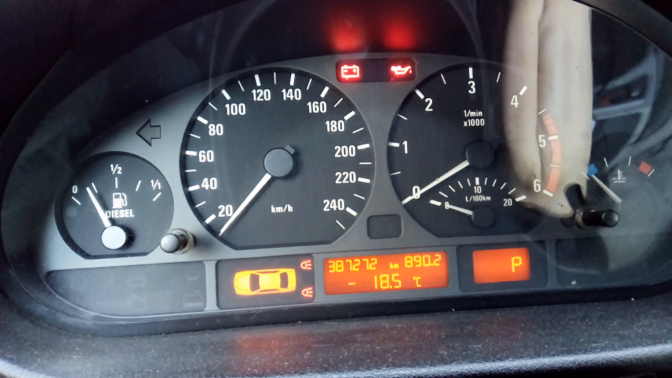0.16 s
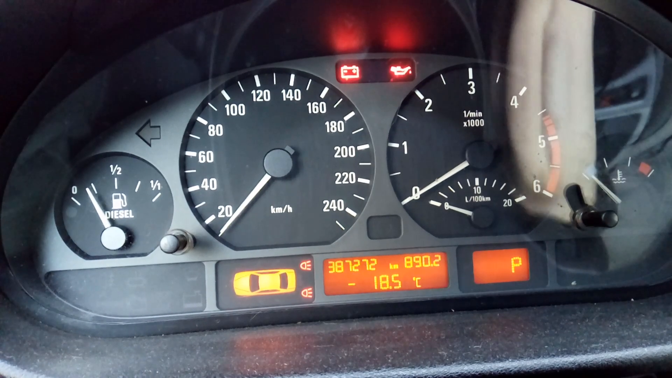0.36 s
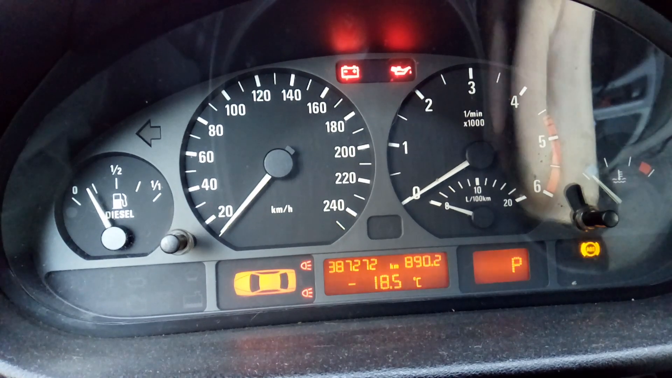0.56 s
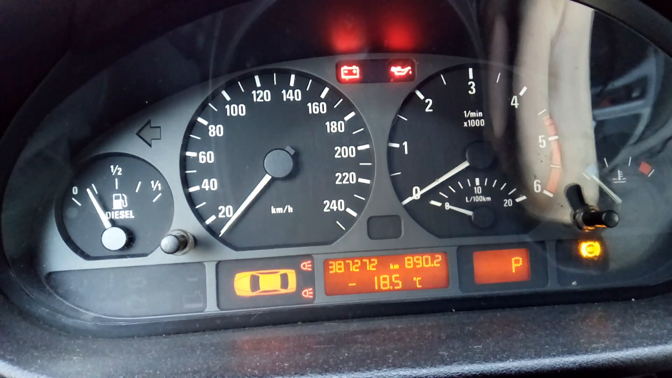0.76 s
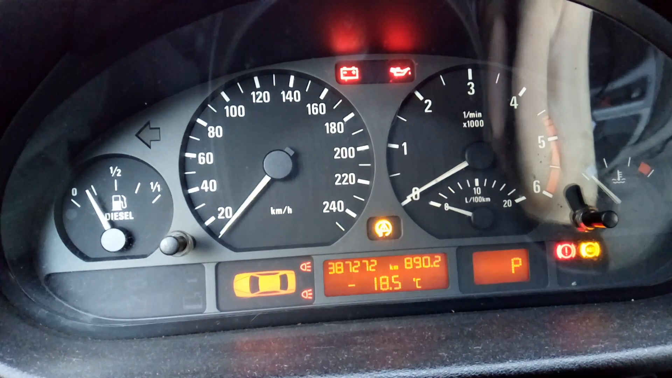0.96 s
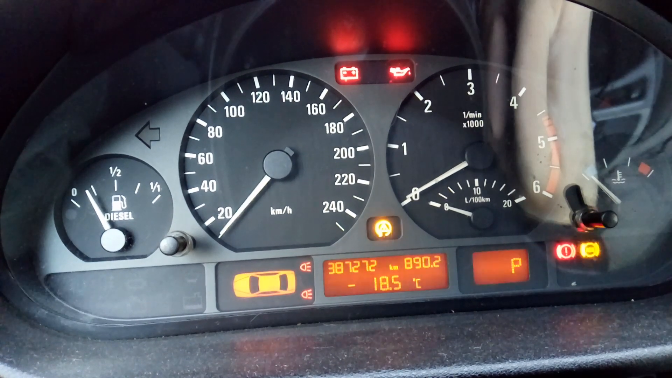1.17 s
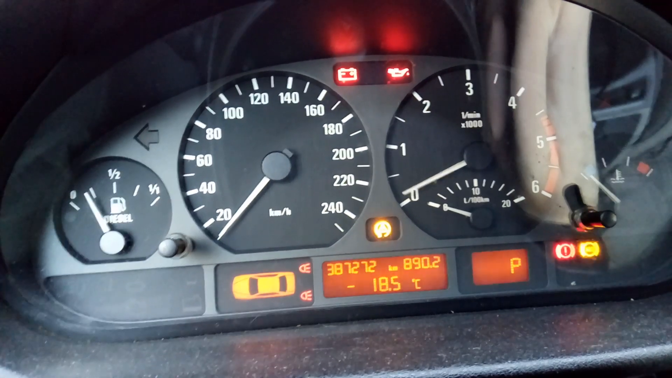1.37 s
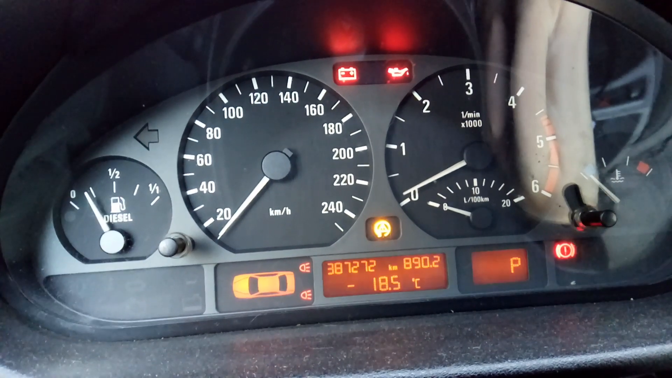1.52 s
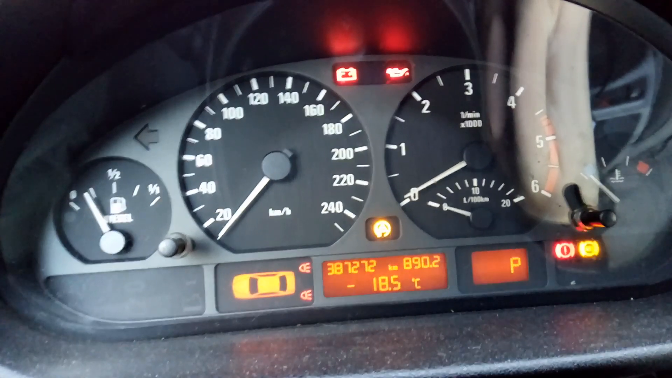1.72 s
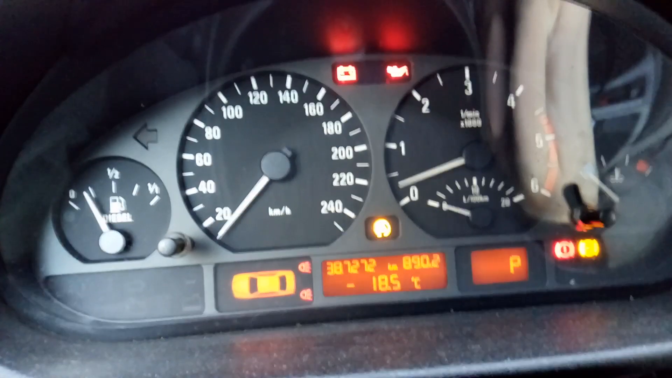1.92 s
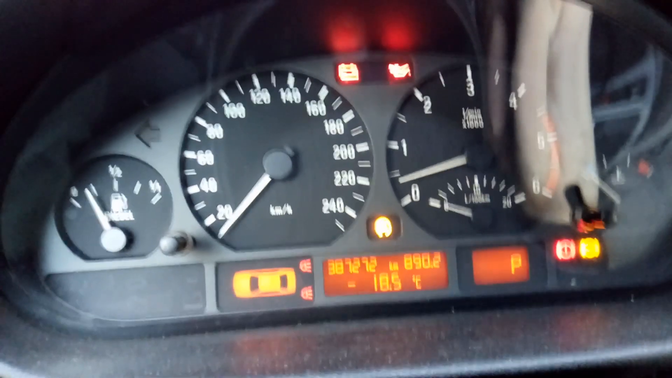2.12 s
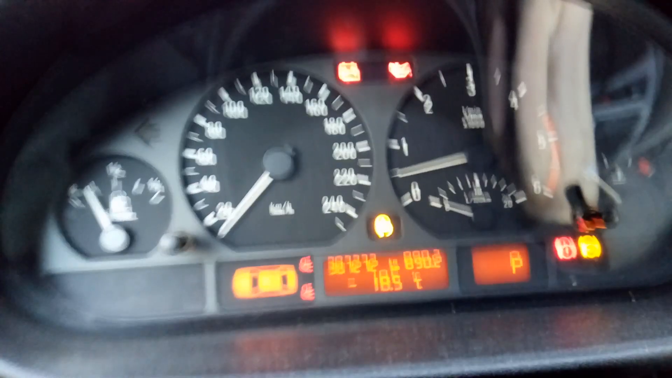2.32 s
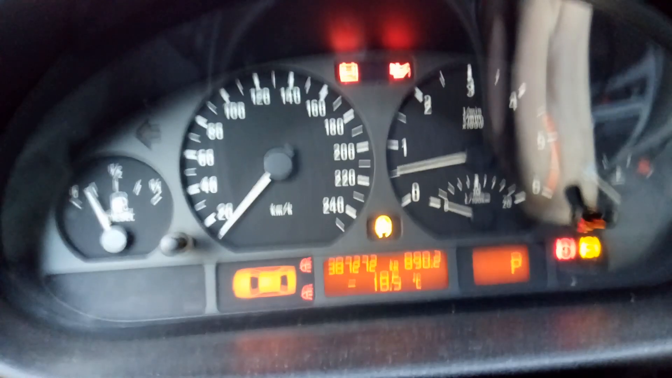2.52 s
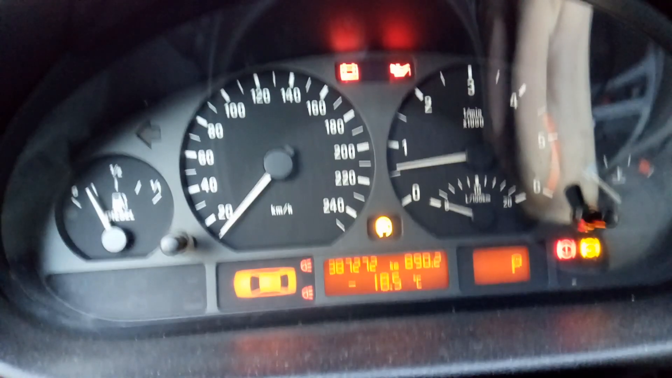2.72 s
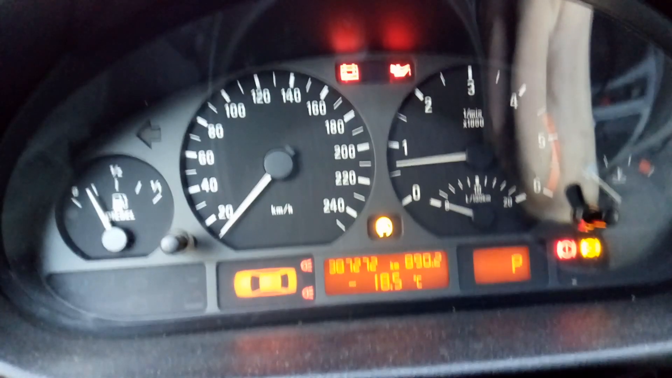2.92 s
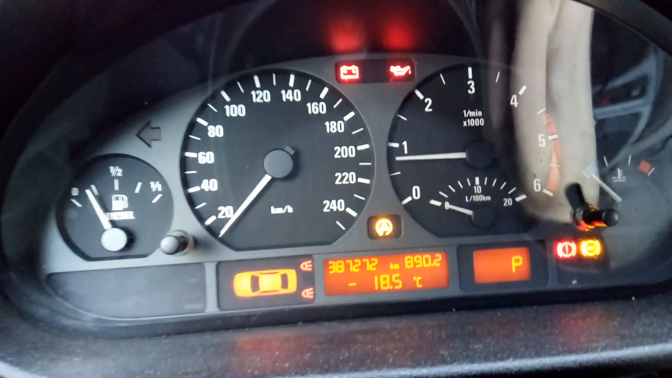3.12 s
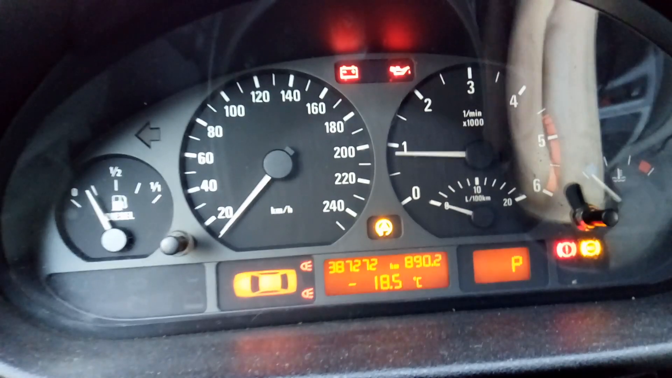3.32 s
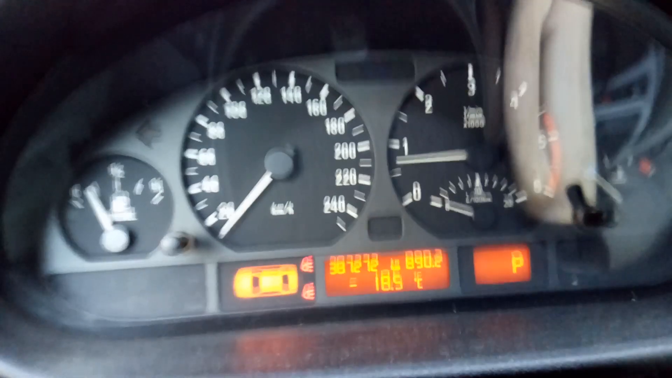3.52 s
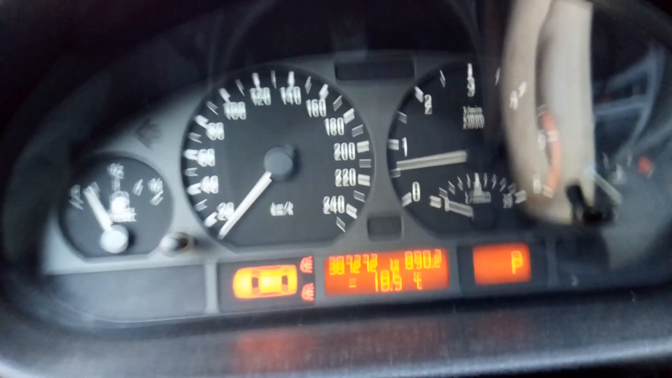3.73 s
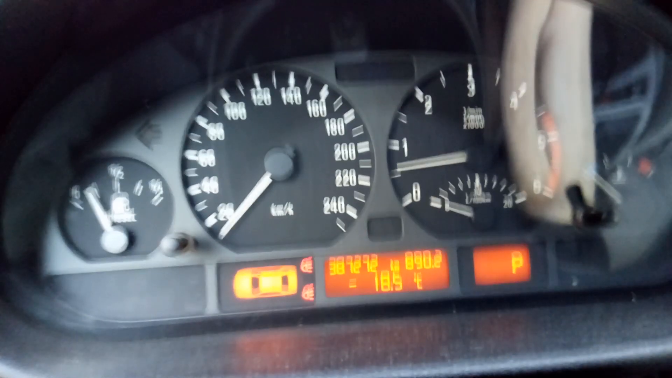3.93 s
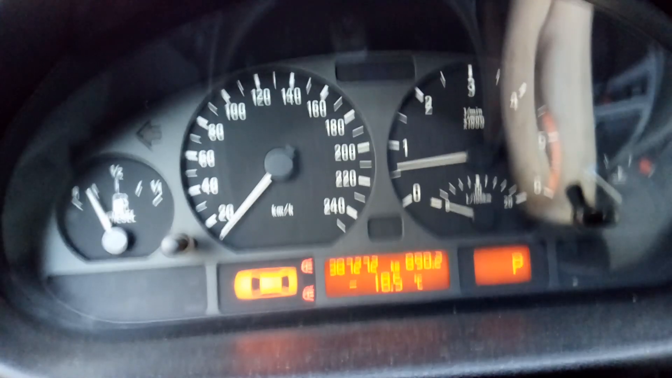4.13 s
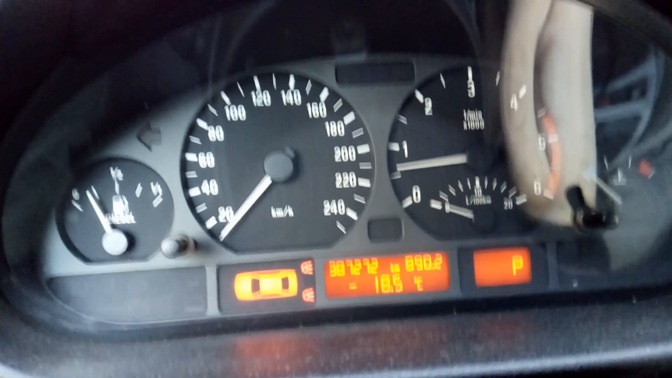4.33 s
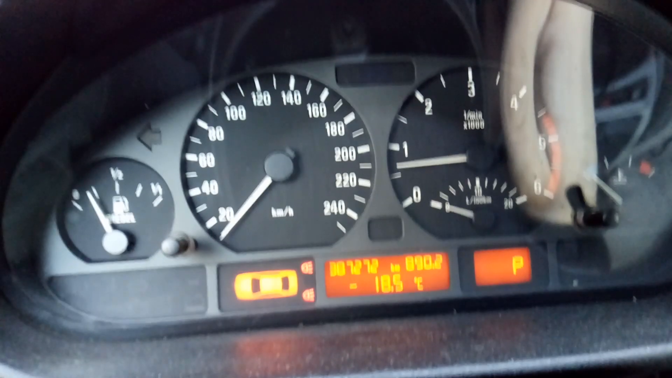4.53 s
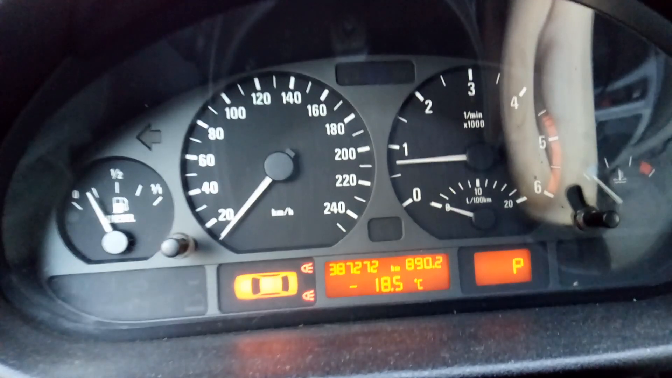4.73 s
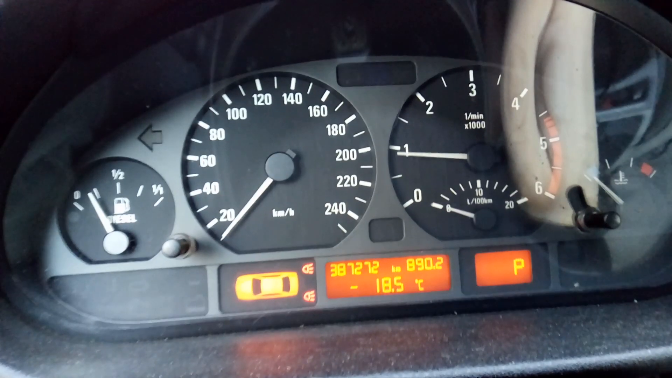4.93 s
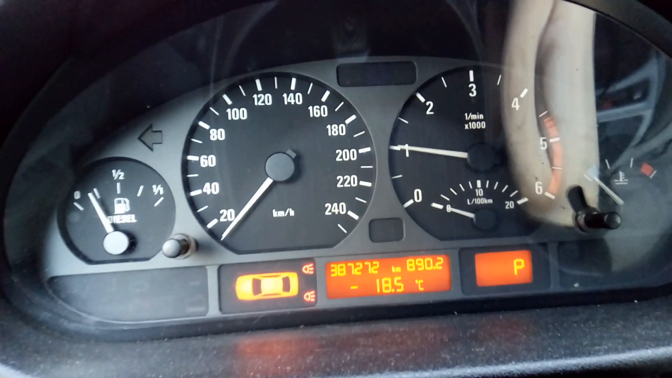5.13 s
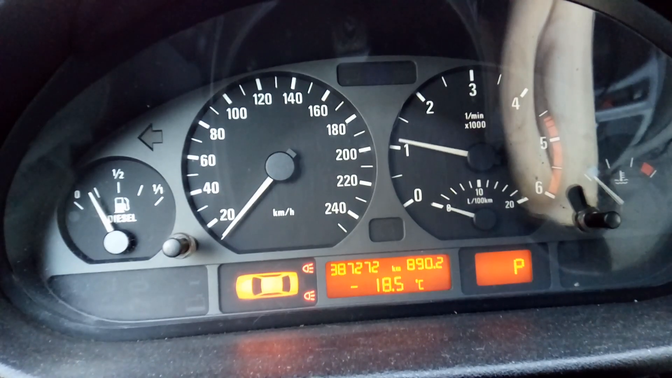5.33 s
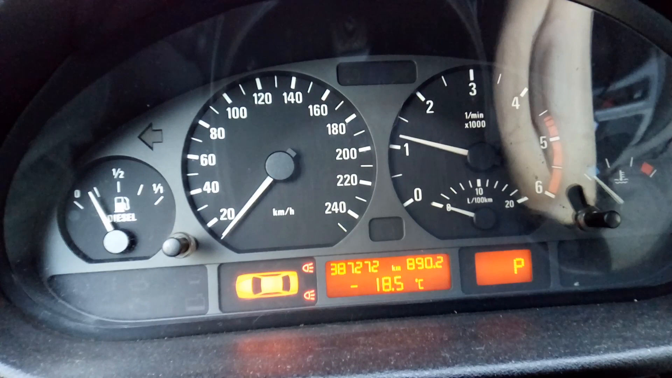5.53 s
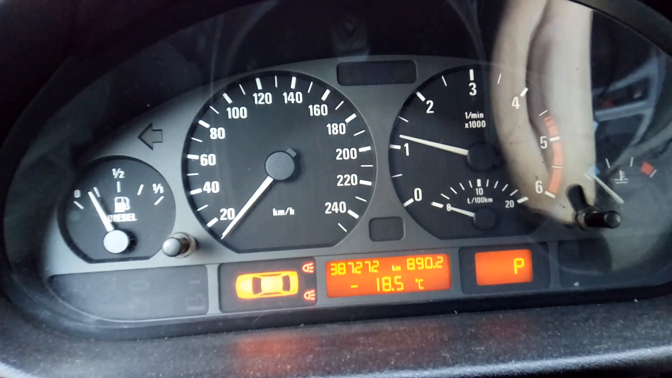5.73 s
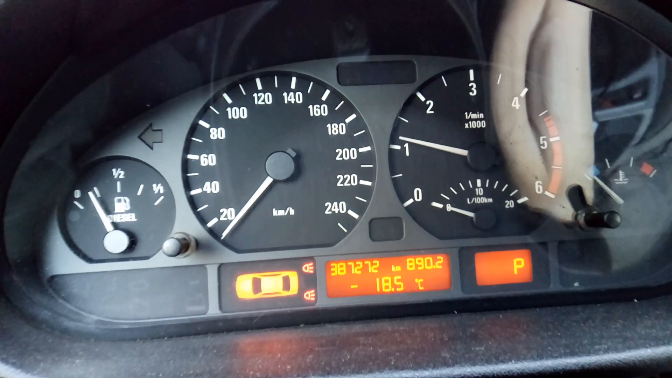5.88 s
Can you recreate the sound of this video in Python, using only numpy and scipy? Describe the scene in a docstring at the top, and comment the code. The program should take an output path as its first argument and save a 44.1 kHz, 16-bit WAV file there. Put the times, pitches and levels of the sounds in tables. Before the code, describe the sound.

Close one-channel sound from the driver's seat of a parked car. For the first half second there is only quiet low cabin tone, a tiny plastic tick and a faint rub of the key. At 0.5 s the ignition switch snaps sharply, the starter jerks into mesh, and it groans in slow heaves with whirring gears until about 1.7 s. Cold diesel cylinders then catch with dull bangs, booming strongly in the cabin around 2.2 to 2.5 s, with metallic clatter, hard knocks, buzzing trim and thin fluttering hiss. The beats quicken to 3.3 s, where a panel rattles. The key snaps back at 3.33 s; the starter drops out and the engine sags into slow, heavy, shaking strokes. From about 4.2 s it speeds up, rattling again near 5 s, and the thuds merge into a low, smooth drone that peaks around 5.4 s and eases slightly by the end.

```python
"""A four-cylinder diesel is started in hard frost, heard from the driver's seat.
First the key clicks over: short bursts of noise ring in the lock. The starter jerks into mesh and drags
the engine through slow compressions, as swelling groan and gear whirr. Cold cylinders then catch with dull
bangs, and every firing sends pulses through engine, cabin and trim. The key is let go and the engine
sags and shakes, then picks up to a fast idle whose strokes merge into a drone of sine waves."""
import sys
import numpy as np
from scipy import signal
from scipy.fft import rfft, irfft
from scipy.io import wavfile
from scipy.ndimage import uniform_filter1d

SR = 44100
rng = np.random.default_rng(int(sys.argv[2]) if len(sys.argv) > 2 else 0)


def log_audio(samples):
    """Write samples as a 16-bit WAV file to the path given in sys.argv[1]."""
    # one column per channel
    frames = np.atleast_2d(samples).T
    # limit to full scale, then quantise
    limited = np.clip(frames, -1, 1)
    pcm = np.round(limited * 32767).astype(np.int16)
    wavfile.write(sys.argv[1], SR, pcm)


N = 262803
T = np.arange(N) / SR  # time of every sample in seconds

# The engine's speed, two firings a revolution. Each row: time in seconds, speed in firings per second.
SPEED = [(1.68, 9.19), (1.9, 13.86), (2.1, 13.98), (2.25, 16.48), (2.48, 18.53), (2.75, 21.67),
         (2.98, 24.57), (3.3, 30.98), (3.39, 29.81), (3.5, 18.91), (3.81, 19.52), (4.14, 19.86),
         (4.63, 24.9), (4.75, 26.9), (4.91, 32), (4.99, 35), (5.13, 35.7), (5.21, 37.4), (5.3, 40),
         (5.45, 40.7), (5.61, 40.1), (5.96, 37.8)]
# How hard the cylinders fire. Each row: time in seconds, effort in dB.
EFFORT = [(1.68, -9.5), (1.86, -9.5), (2.0, -4), (2.08, -8.5), (2.23, 0.5), (2.38, -0.5), (2.64, 0.5),
          (2.95, -1.5), (3.33, 0), (3.41, -5.5), (3.56, .5), (4.25, 1), (4.35, -2), (4.7, -1.5), (4.87, -1),
          (5.05, 0.5), (5.13, -3), (5.94, -1.5)]
# How each voice of the engine follows it. Each row: level in dB at BASE_RATE and zero effort,
# dB per dB of effort, dB per octave of speed.
VOICE_LAWS = {"boom": (-22.5, 1, -4), "thud": (-30.5, 1.9, -16), "combustion": (-29.5, 1, -3.5),
              "clatter": (-49, 0.82, -1), "ring": (-60, 1, 12), "trim": (-57, 4.2, -9.5)}
# The four cylinders in firing order, compared with each other. Each row: thump in dB, knock in dB.
CYLINDERS = [(0.5, -14.5), (0.5, -13), (1, -15.5), (-1, -15.5)]
# The stroke comes earlier as the engine speeds up. Each row: firings per second, delay in seconds.
STROKE_TIMING = [(15, .002), (19, -.011)]
# The drone's tones, compared with each other. Each entry: level in dB, starting at 2.5 times
# the firing rate and going up in steps of a half.
DRONE_DB = [-12, 6, -7.5, -4.5, -18.5, -11, -21.5, -15.5, -25.5, -13, -22.5, -19]
# Level of the low shake. Each row: time in seconds, level in dB.
SHAKE_LEVEL = [(1.68, -33.5), (2, -29), (2.19, -26.5), (2.33, -24), (2.6, -18), (3.07, -19), (3.45, -28),
               (3.62, -19.5), (4.35, -20), (4.75, -18.5), (4.79, -31), (4.93, -24.5), (5, -31.5),
               (5.45, -39), (5.8, -32), (5.96, -39)]
# A short scrape of the starter at 1.85 s, then a dashboard panel rattles during two climbs in speed.
# Each row: start of full level in seconds, end of it in seconds, level in dB.
SCRAPE_AND_RATTLES = [(1.843, 1.862, -52.5), (3.19, 3.37, -47.5), (4.86, 5.054, -48)]
# The starter heaves against each compression. Each row: start in seconds, groan in dB, gear whirr in dB.
COMPRESSIONS = [(.545, -65, -43.5), (.775, -57, -43), (1.025, -48, -41.5), (1.255, -33.5, -40),
                (1.43, -54, -42)]
# Cold cylinders catching. Each row: start in seconds, cabin boom in dB, bang in dB.
CATCHES = [(1.683, -28, -47), (1.734, -44, -43), (1.829, -43, -47), (1.977, -27.5, -37.5),
           (2.087, -33, -42), (2.15, -27, -36), (2.215, -28, -32), (2.277, -17, -31), (2.334, -16.5, -33),
           (2.392, -17, -34), (2.447, -26, -34), (3.566, -20, -37)]
# Single hard knocks. Each row: start in seconds, level in dB.
HARD_KNOCKS = [(1.311, -44.5), (1.787, -51), (1.84, -48), (1.896, -44), (2.11, -42), (2.246, -37.5),
               (2.307, -43), (2.523, -42), (2.597, -43), (2.648, -37.5), (2.872, -47), (3.079, -40),
               (3.186, -37), (3.221, -38.5), (3.253, -46), (3.296, -32), (3.461, -48), (3.674, -43),
               (3.745, -38.5), (4.243, -45), (4.538, -34.5), (4.736, -42), (4.775, -35), (4.81, -40),
               (4.84, -33.5), (5.024, -36.5), (5.611, -40.5)]
# The ignition switch, turned and let go. Each row: start in seconds, snap in dB,
# time in seconds to die away by 60 dB, bright part in dB, top part in dB.
KEY_MOVES = [(0.5216, -16, 0.044, -32, -22), (3.3337, -14, 0.041, -19.5, -27)]
# Loose plastic ticking. Each row: start in seconds, level in dB.
TICKS = [(0.025, -45.5), (0.578, -47.5), (0.604, -44.5), (1.308, -42.5), (1.761, -39.5), (1.958, -42),
         (1.992, -47), (2.308, -31), (2.358, -40.5), (2.663, -43), (4.966, -47.5)]

# The tables below shape tone; their dB values compare the pitches with each other.
# The shake of the block on its mounts. Each row: frequency in Hz, level in dB.
SHAKE = [(10, -36.5), (20, -18.5), (30, -21), (39, -11.5), (58, 5), (75, 5.5), (95, -3), (130, -61.5),
         (250, -82)]
# The slow unsteady sway under the shake. Each row: frequency in Hz, level in dB.
SWAY = [(6, -10.5), (12, -6.5), (22, -3.5), (32, -6), (50, -32.5)]
# The boom of the cabin. Each row: frequency in Hz, level in dB.
BOOM = [(50, -31.5), (85, -22.5), (105, -1.5), (124, 2), (140, 0.5), (165, -2.5), (205, -7.5), (260, -17.5),
        (500, -58.5)]
# The body panels under a hard stroke. Each row: frequency in Hz, level in dB.
THUD = [(120, -19.5), (155, -5), (178, 9.5), (205, -1), (260, -12), (340, -13), (480, -31.5)]
# The burning fuel. Each row: frequency in Hz, level in dB.
COMBUSTION = [(120, -36), (200, 2.5), (444, -8.5), (478, -9.5), (565, -4.5), (622, -11.5), (679, -11.5),
              (731, -13.5), (910, -23.5), (1080, -22.5), (1150, -27.5), (1500, -45.5), (2530, -120)]
# The metallic clatter of the engine. Each row: frequency in Hz, level in dB.
CLATTER = [(530, -31), (900, 3.5), (1080, -3.5), (1280, -2), (1470, -3.5), (1880, -7.5), (2110, -9),
           (2620, -14), (2830, -14), (3670, -19.5), (4200, -19.5), (5460, -58), (9240, -120)]
# The casing that rings with the clatter. Each row: frequency in Hz, level in dB.
CASING_COLOUR = [(700, -22), (1200, 0), (1600, -7), (2060, -5), (2600, -9), (3400, -30)]
# The buzzing trim. Each row: frequency in Hz, level in dB.
TRIM = [(1530, -39), (2600, -8), (2850, 2), (3070, -4.5), (3740, -8.5), (4380, -6.5), (5090, -6.5),
        (5970, -11), (6430, -13), (9380, -27), (10900, -27.5), (12700, -28.5), (13900, -21.5),
        (15000, -16.5), (15800, -27.5)]
# The dashboard panel, also lent to the scrape. Each row: frequency in Hz, level in dB.
PANEL = [(1200, 3), (2100, -2), (2900, -3), (3700, -3.5), (4200, -27.5), (6000, -17)]
# The starter's groan. Each row: frequency in Hz, level in dB.
GROAN = [(24, -49), (40, -19), (73, -6.5), (91, -2.5), (135, -4), (173, -13.5), (310, -17.5), (330, -18),
         (430, -34), (730, -120)]
# The whirr of the starter's gears. Each row: frequency in Hz, level in dB.
WHIRR = [(160, -37), (270, -0.5), (390, -4.5), (432, -7), (486, -3.5), (554, -14.5), (671, -8), (743, -12),
         (1010, -15), (1900, -25), (2110, -20.5), (3040, -29.5), (6420, -43), (9000, -60), (11700, -71),
         (19800, -120)]
# The bang of a catching cylinder. Each row: frequency in Hz, level in dB.
BANG = [(150, -12), (250, -3), (480, 0), (700, -1), (1100, -10), (2500, -23), (4000, -40)]
# A single hard knock. Each row: frequency in Hz, level in dB.
KNOCK = [(250, -12), (500, 1), (750, 0), (1200, -6), (2200, -15), (3500, -26), (5000, -40)]
# The snapping, rubbing ignition switch. Each row: frequency in Hz, level in dB.
SWITCH = [(250, -12), (550, -8), (1100, -8), (1400, -11), (1750, -3), (2400, -3), (3500, 0), (4400, 0),
          (5500, -2), (7000, .5), (8200, -7), (11000, -9.5), (13400, -13), (14800, -8), (15600, -13)]
# The bright part of the key's click, around 6 kHz. Each row: frequency in Hz, level in dB.
CLICK_BRIGHT = [(4500, -14), (5600, 0), (6700, 0), (8200, -6), (9500, -24)]
# The highest part of the key's click, above 10 kHz. Each row: frequency in Hz, level in dB.
CLICK_TOP = [(9000, -12), (11000, -7), (13500, -19), (14800, 3), (15700, -1)]
# The key settling in the lock. Each row: frequency in Hz, level in dB.
KEY_RING = [(3000, -25), (4200, 3), (4700, 8), (6000, -24)]
# The steering column and the loose plastic. Each row: frequency in Hz, level in dB.
TICK_COLOUR = [(900, 2.5), (2500, -3), (4500, 0.5), (7000, -2.5), (8200, -15.5), (13000, -22.5),
               (15000, -18), (15800, -13)]
# The thin hiss from the engine bay. Each row: frequency in Hz, level in dB.
HISS_COLOUR = [(4800, -11), (5400, -2.5), (5900, -8.5), (6300, -3.5), (7200, -6), (7700, -13), (8200, -17)]
# The quiet cabin. Each row: frequency in Hz, level in dB.
CABIN = [(15, -50), (25, -13), (53, 7), (96, 2.5), (130, 5.5), (174, -7.5), (437, -10), (1060, -24.5),
         (2200, -22.5), (2390, -25.5), (2590, -21.5), (6660, -41.5), (8970, -59.5), (14600, -37),
         (15800, -22.5)]

# The tables below are resonances: each lifts a narrow band above the tone around it.
# The engine block. Each row: centre in Hz, width in Hz, lift in dB.
BLOCK = [(2060, 70, 4.5), (2815, 70, 6), (3500, 55, 7)]
# The engine casing. Each row: centre in Hz, width in Hz, lift in dB.
CASING = [(1203, 55, 17), (2060, 90, 9)]
# The bulkhead between engine and cabin. Each row: centre in Hz, width in Hz, lift in dB.
BULKHEAD = [(475, 35, 3.7), (675, 18, 5.7)]
# The air of the cabin. Each row: centre in Hz, width in Hz, lift in dB.
CABIN_RING = [(126, 16, 6.9)]
# The dashboard panel. Each row: centre in Hz, width in Hz, lift in dB.
PANEL_RINGS = [(1203, 70, 6), (1750, 90, 4)]
# The starter. Each row: centre in Hz, width in Hz, lift in dB.
STARTER = [(309, 18, 3.4), (504, 43, 10.3)]
# The lock. Each row: centre in Hz, width in Hz, lift in dB.
LOCK = [(1720, 37, 2.9), (2180, 94, 2.7), (3280, 290, 13), (3670, 200, 6.8), (4480, 88, 12),
        (4910, 180, 9.9), (6600, 200, 2.4), (6500, 230, 6.2), (7840, 270, 4.8), (15000, 490, 8.5)]
# The hiss. Each row: centre in Hz, width in Hz, lift in dB.
HISS_RINGS = [(6353, 120, 12), (7300, 170, 4.3)]

# The starter engages, its load begins to ease, the first cylinder fires, the starter drops out (s)
ENGAGE_S, RELIEF_S, FIRE_S, DROP_S = .55, 1.56, 1.68, 3.35
# Speed at which the voice levels are given, and speed below which they stop changing (firings per second)
BASE_RATE, SLOWEST_RATE = 20, 19
# Share of power that each cylinder repeats exactly, in the burn and in the clatter (0-1)
BURN_REPEATS, CLATTER_REPEATS = .45, .5
# Extra casing ring while the engine fires with the starter in mesh (dB)
CASING_OVERRUN_DB = 6
# Share of ragged rumble between the strokes (0-1): cold, once settled, at speed
RAGGED_COLD, RAGGED_SETTLED, RAGGED_FAST = .35, .07, .3
SETTLING_S = (3.1, 3.9)  # the firing settles between these times (s)
# The strokes blur, then merge into a drone, over these speeds (firings per second); final drone share (0-1)
BLUR_RATES, DRONE_RATES, DRONE_SHARE = (4.8, 25), (30.1, 35.5), 0.96
# A cabin resonance that the drone climbs through: centre (Hz), width (Hz), lift (dB)
CABIN_HZ, CABIN_WIDTH_HZ, CABIN_PEAK_DB = 108.9, 3.8, 5.5
THUD_LAG_S = 0.00502  # the panels answer a moment after the stroke (s)
RATTLE_RISE_S, RATTLE_FALL_S = 0.12, 0.028
# Each heave: rise, and the times in which groan and whirr die away by 60 dB (s)
HEAVE_RISE_S, GROAN_T60, WHIRR_T60 = 0.023, 0.89, 0.38
# The starter between compressions, and the buzz it adds to the trim while the engine overruns it (dB)
GROAN_DB, WHIRR_DB, OVERRUN_DB = -41.5, -51.5, -60.5
CRACK_DB = 25  # the sharp onset of a bang or knock over its scatter (dB)
SETTLE_S = 3.4335  # the key settles in the lock (s)
# The hiss: compared with the gear whirr while cranking, during overrun, with the engine alone (dB)
HISS_CRANK_DB, HISS_OVERRUN_DB, HISS_RUN_DB = -23.5, -58.5, -68
CABIN_DB = -50.5
EDGE_HZ = 15750  # upper edge of the sound (Hz)


def engine():
    """Every firing gives a low stroke, a dull burn, a metallic knock and a buzz of the trim."""
    shake, boom, thud, combustion, clatter, ring, trim = voices()
    s, rate = np.transpose(SPEED)
    turns = np.cumsum(np.interp(T, s, rate, left=0)) / SR  # firings so far
    times = T[1:][np.diff(np.ceil(turns)) > 0]
    chance = rng.standard_normal((len(times), 3)).T
    thump_db, knock_db = np.array(CYLINDERS)[np.arange(len(times)) % len(CYLINDERS)].T

    # the burn comes dulled through the bulkhead
    gas = beats(times, gain_of(1.5 * chance[0]), delay=-.007, decay=.008)
    burn = steadied(colour((gas + 1) * repeating(times, BURN_REPEATS), COMBUSTION, BULKHEAD))

    # knock rings the block, pistons slap between firings, and valves and injectors tick on steadily
    knock = beats(times, gain_of(knock_db - knock_db.mean() + chance[1]), delay=.008, decay=.005)
    slap_times = times + .55 / np.interp(times, s, rate)
    slap = beats(slap_times, .7, delay=.008, decay=.004)
    ticking = (knock + slap + .33) * repeating(times, CLATTER_REPEATS)
    metal = steadied(colour(ticking, CLATTER, BLOCK))
    casing = steadied(colour(ticking, CASING_COLOUR, CASING))

    # the trim buzzes just after each jolt and more softly on the rebound; slow firings jolt it hardest
    jolt = beats(times, gain_of(.4 * chance[2]), delay=.0105, decay=.0075)
    rebound = beats(times, gain_of(-1.5 + .5 * chance[1]), delay=0.043, decay=0.0058)
    slowness = np.interp(T, s, np.minimum(20 / np.maximum(rate, 1), 1))
    shaking = uniform_filter1d(jolt + rebound, SR // 200) * slowness ** 2
    chatter = (shaking + .1) * grit(per_s=9000, spread_db=.7)
    buzz = steadied(colour(chatter, TRIM))

    upper = combustion * burn + clatter * metal + ring * casing + trim * buzz
    return strokes(turns, times, thump_db, shake, boom, thud) + upper + scrape_and_rattle(turns)


def strokes(turns, times, thump_db, shake, boom, thud):
    """Each firing rocks the block on its mounts and booms in the cabin; at speed the booms merge into a drone."""
    rate = firing_rate()
    cold = np.interp(T, SETTLING_S, [RAGGED_COLD, RAGGED_SETTLED])
    ragged = np.maximum(cold, np.interp(rate, BLUR_RATES, [RAGGED_SETTLED, RAGGED_FAST]))
    smooth = np.interp(rate, DRONE_RATES, [0, DRONE_SHARE])
    strength = gain_of(thump_db + .6 * rng.standard_normal(len(times)))
    delay = np.interp(np.interp(times, T, rate), *np.transpose(STROKE_TIMING))
    push = beats(times, strength, delay=delay, decay=0.00075)
    rocking = steadied(blend(steadied(colour(push, SHAKE)), noise(SHAKE), ragged / 2))
    booming = steadied(blend(steadied(colour(push, BOOM)), noise(BOOM), ragged))
    drone = droning(turns, rate)
    late_push = beats(times, strength, delay=delay + THUD_LAG_S, decay=.0012)
    thudding = steadied(colour(late_push, THUD))
    low = shake * (rocking + gain_of(-9.5) * noise(SWAY))
    return low + boom * blend(booming, drone, smooth) + thud * thudding


def droning(turns, rate):
    """Wavering sine tones follow the firing rate and swell as the strongest crosses a cabin resonance."""
    tones = 0
    for half_steps, db in enumerate(DRONE_DB, 5):
        cycles = half_steps / 2 * turns + rng.random()
        tones = tones + gain_of(db + wander(hz=9)) * np.sin(2 * np.pi * cycles)
    offset = 2 * (3 * rate - CABIN_HZ) / CABIN_WIDTH_HZ  # the strongest tone is 3 times the firing rate
    return evened(tones) * gain_of(CABIN_PEAK_DB / (1 + offset ** 2))


def scrape_and_rattle(turns):
    """Grit pulsing with every firing: first a short starter scrape, later a loose panel against its frame."""
    level = sum(gain_of(db) * gate(start, end, RATTLE_RISE_S, RATTLE_FALL_S)
                for start, end, db in SCRAPE_AND_RATTLES)
    contact = .22 + np.exp(-((turns - .2) % 1) / .22)
    return level * steadied(colour(contact * grit(per_s=2000, spread_db=1.2), PANEL, PANEL_RINGS))


def voices():
    """Gains of the engine's voices, from its effort and speed; the shake has its own level."""
    effort = np.interp(T, *np.transpose(EFFORT))
    octaves = np.log2(np.maximum(firing_rate(), SLOWEST_RATE) / BASE_RATE)
    boom, thud, combustion, clatter, ring, trim = (
        running() * gain_of(db + per_effort * effort + per_octave * octaves)
        for db, per_effort, per_octave in VOICE_LAWS.values())
    shake = running() * gain_of(np.interp(T, *np.transpose(SHAKE_LEVEL)))
    ring = ring * gain_of(CASING_OVERRUN_DB * overrun())
    trim = np.hypot(trim, gain_of(OVERRUN_DB) * overrun())
    return shake, boom, thud, combustion, clatter, ring, trim


def firing_rate():
    """Firings per second at every moment."""
    return np.interp(T, *np.transpose(SPEED))


def running():
    """Opens just ahead of the first firing and stays open."""
    return np.clip(1 + (T - FIRE_S) / 0.088, 0, 1)


def overrun():
    """Open while the engine fires with the starter still in mesh."""
    return gate(FIRE_S, DROP_S, rise=0.08, fall=0.028)


def repeating(times, share):
    """Grit that each cylinder partly repeats from one firing to its next."""
    own = np.zeros(N)
    count = len(CYLINDERS)
    patterns = grit(per_s=6000, spread_db=.5)[:count * (SR // 4)].reshape(count, -1)
    edges = np.append((times * SR).astype(int), N)
    for k, (start, end) in enumerate(zip(edges, edges[1:])):
        part = patterns[k % count][:end - start]
        own[start:start + len(part)] = part
    return blend(grit(per_s=4500, spread_db=.8), own, share)


def starter():
    """The starter engages with a jerk, then groans while its gears whirr."""
    groan, whirr = heaves()
    jerk = gain_of(-24.5) * burst(ENGAGE_S, rise=0.0031, t60=0.094)
    gears = steadied(colour(grit(per_s=3300, spread_db=0.0), WHIRR, STARTER))
    return (groan + jerk) * steadied(noise(GROAN)) + whirr * gears


def heaves():
    """Gains of the starter's groan and whirr: they swell at each compression, then fade as the load eases."""
    groan = gain_of(GROAN_DB) + sum(gain_of(db) * burst(s, HEAVE_RISE_S, GROAN_T60) for s, db, _ in COMPRESSIONS)
    whirr = gain_of(WHIRR_DB) + sum(gain_of(db) * burst(s, HEAVE_RISE_S, WHIRR_T60) for s, _, db in COMPRESSIONS)
    loaded = gate(ENGAGE_S, RELIEF_S, rise=0.051, fall=0.21)
    return loaded * groan, loaded * whirr


def knocks():
    """Cold cylinders catch with dull bangs and set the cabin booming; single knocks ring the block."""
    booms = sum(gain_of(db) * burst(s, rise=0.016, t60=0.48) for s, db, _ in CATCHES)
    bangs = sum(gain_of(db) * blow(s, t60=0.067) for s, _, db in CATCHES)
    blows = sum(gain_of(db) * blow(s, t60=0.063) for s, db in HARD_KNOCKS)
    booming = booms * steadied(noise(BOOM, CABIN_RING))
    return booming + struck(bangs, BANG, BULKHEAD) + struck(blows, KNOCK, BLOCK)


def key():
    """The switch snaps in its lock, the steering column rings on briefly, the key settles; loose plastic ticks."""
    snap = sum(gain_of(db) * burst(s, rise=0.001, t60=t60) for s, db, t60, _, _ in KEY_MOVES)
    bright = sum(gain_of(db) * burst(s, rise=0.0014, t60=t60) for s, _, t60, db, _ in KEY_MOVES)
    top = sum(gain_of(db) * burst(s, rise=0.00062, t60=t60) for s, _, t60, _, db in KEY_MOVES)
    column = sum(gain_of(db - 15.5) * burst(s, rise=0.0055, t60=0.11) for s, db, *_ in KEY_MOVES)
    ticks = sum(gain_of(db) * burst(s, rise=0.00059, t60=0.046) for s, db in TICKS)
    settle = gain_of(-48.5) * burst(SETTLE_S, rise=.0006, t60=0.033)
    clack = snap * noise(SWITCH, LOCK) + bright * noise(CLICK_BRIGHT, LOCK) + top * noise(CLICK_TOP)
    return clack + (column + ticks) * noise(TICK_COLOUR) + settle * noise(KEY_RING)


def hiss():
    """A narrow, ringing hiss that flutters, strongest while the key is held and the engine fires."""
    cranking = gain_of(HISS_CRANK_DB) * heaves()[1]
    overrunning = gain_of(HISS_OVERRUN_DB) * overrun()
    alone = gain_of(HISS_RUN_DB) * (running() - overrun())
    flutter = gain_of(2.2 * wander(hz=45))
    return (cranking + overrunning + alone) * flutter * noise(HISS_COLOUR, HISS_RINGS)


def cabin():
    """The quiet cabin, and a faint rustle that swells as the key rubs in the lock on turning."""
    rub = np.interp(T, [.36, .46, .6, .85], [0.34, 1.0, 0.93, 0.36]) * noise(SWITCH)
    return gain_of(CABIN_DB) * noise(CABIN) + gain_of(-60.5) * rub


def gain_of(db):
    """Turns decibels into amplitude."""
    return 10 ** (np.asarray(db) / 20)


def evened(x):
    """Scales to an average strength (rms) of one."""
    return x / np.sqrt(np.mean(x ** 2) + 1e-20)


def steadied(x):
    """Holds the rms near one over a fraction of a second, so quick beats stay but slow swells go."""
    size = SR // 7
    power = uniform_filter1d(uniform_filter1d(x ** 2, size), size)
    return x / np.sqrt(abs(power) + 1e-4 * np.mean(x ** 2))


def colour(x, spectrum, modes=()):
    """Rings x through a body with this spectrum and these resonances; no sound comes before its blow."""
    size = 16384
    hz = np.fft.rfftfreq(size, 1 / SR) + 1
    f, db = np.transpose(spectrum)
    octaves_outside = np.maximum(np.log2(f[0] / hz), 0) + np.maximum(np.log2(hz / f[-1]), 0)
    db = np.interp(np.log(hz), np.log(f), db) - 30 * octaves_outside
    db = db + sum(peak / (1 + (2 * (hz - centre) / width) ** 2) for centre, width, peak in modes)
    # folding the cepstrum gives the minimum-phase response, which starts at once
    cepstrum = irfft(np.log(gain_of(np.maximum(db, -100))))
    cepstrum[1:size // 2] *= 2
    cepstrum[size // 2 + 1:] = 0
    response = irfft(np.exp(rfft(cepstrum)))[:size // 2]
    return signal.oaconvolve(x, response)[:N]


def noise(spectrum, modes=()):
    """Noise of unit rms through a body."""
    return evened(colour(rng.standard_normal(N), spectrum, modes))


def wander(hz):
    """Slow random drift with an rms of one."""
    f = np.fft.rfftfreq(N, 1 / SR)
    return evened(irfft(rfft(rng.standard_normal(N)) * np.exp(-(f / hz) ** 2), N))


def grit(per_s, spread_db):
    """Random tiny impacts of uneven size."""
    size = gain_of(spread_db * np.minimum(rng.exponential(1, N), 4))
    return evened(size * rng.standard_normal(N) * (rng.random(N) < per_s / SR))


def beats(times, size, delay, decay):
    """An envelope that jumps near each firing, shifted by the delay, and sinks until the next."""
    kicks = np.zeros(N)
    np.add.at(kicks, np.clip(((times + delay) * SR).astype(int), 0, N - 1), size)
    return signal.lfilter([1], [1, -np.exp(-1 / (decay * SR))], kicks)


def burst(s, rise, t60):
    """An envelope that starts at s, rises and dies away by 60 dB in t60 seconds."""
    age = np.maximum(T - s, 0)
    return (1 - np.exp(-age / rise)) * np.exp(-np.log(1000) * age / t60)


def gate(start, end, rise, fall):
    """One from start to end, with a ramp before and after."""
    return np.clip(1 + (T - start) / rise, 0, 1) * np.clip(1 - (T - end) / fall, 0, 1)


def blend(a, b, share):
    """Crossfades at constant power from a to b."""
    share = np.clip(share, 0, 1)
    return np.sqrt(1 - share) * a + np.sqrt(share) * b


def blow(s, t60):
    """A sharp impact followed by a short noisy scatter."""
    crack = np.zeros(N)
    crack[round(s * SR)] = gain_of(CRACK_DB)
    return crack + burst(s, rise=.0005, t60=t60) * rng.standard_normal(N)


def struck(drive, spectrum, modes=()):
    """Rings a body with blows, scaled so that a single click keeps its energy."""
    click = colour(signal.unit_impulse(N), spectrum, modes)
    return colour(drive, spectrum, modes) / np.linalg.norm(click)


def scene():
    """Everything heard in the cabin, on one channel."""
    return (engine() + starter() + knocks() + key() + hiss() + cabin())[None]


def record(dry):
    """Removes everything above the upper edge of the sound."""
    low_pass = signal.firwin(511, EDGE_HZ, window=("kaiser", 9), fs=SR)
    return signal.oaconvolve(dry, low_pass[None], "same")


dry = scene()
out = record(dry)
log_audio(out)
```